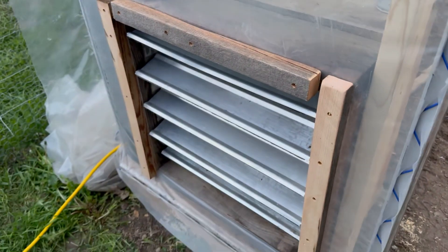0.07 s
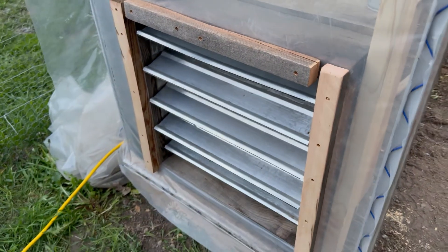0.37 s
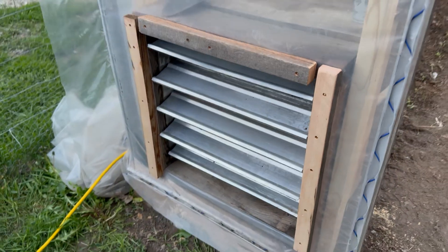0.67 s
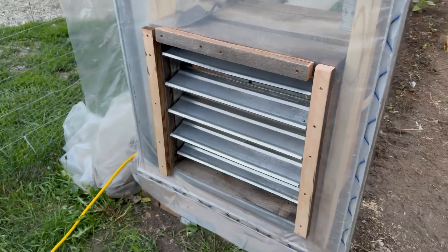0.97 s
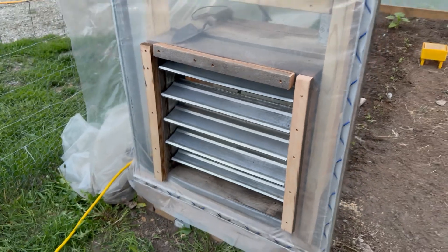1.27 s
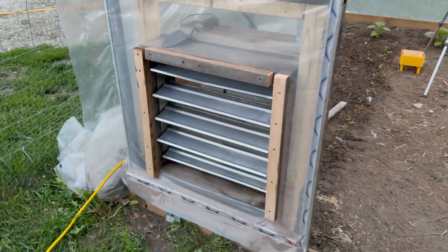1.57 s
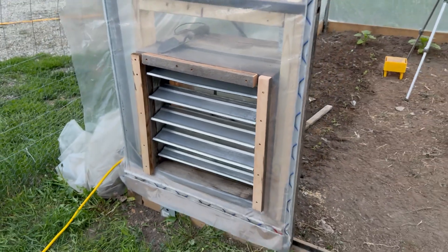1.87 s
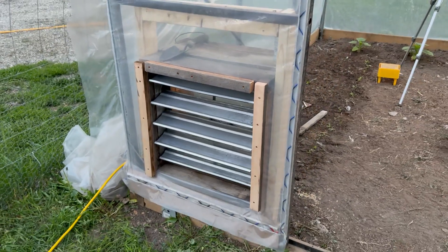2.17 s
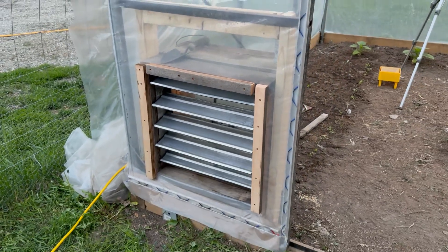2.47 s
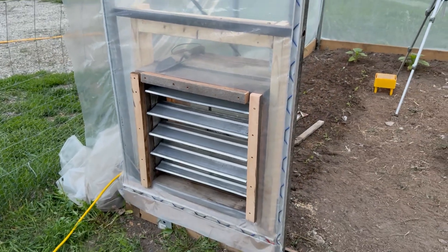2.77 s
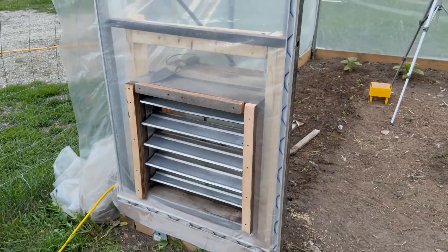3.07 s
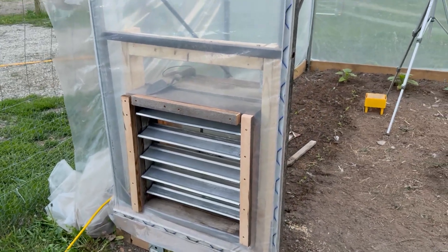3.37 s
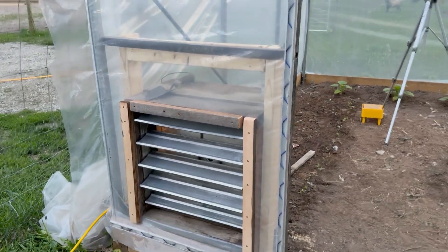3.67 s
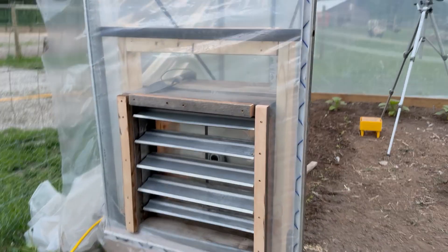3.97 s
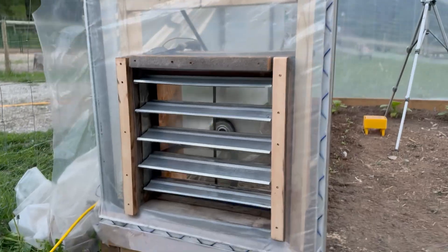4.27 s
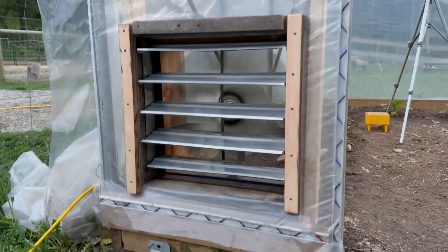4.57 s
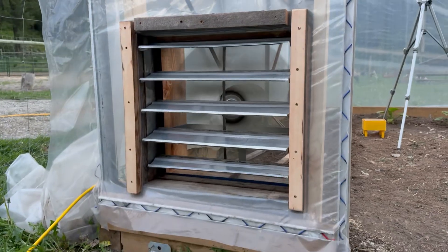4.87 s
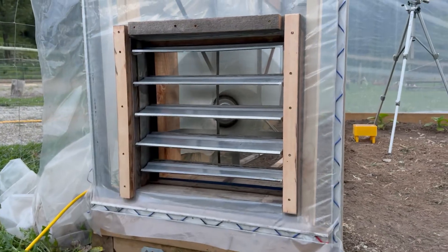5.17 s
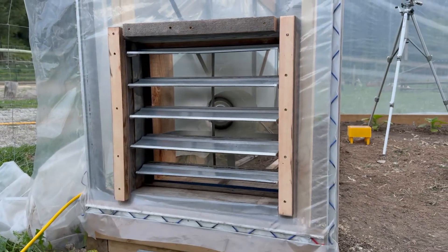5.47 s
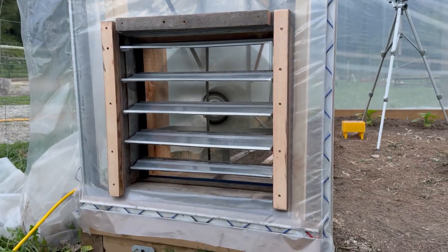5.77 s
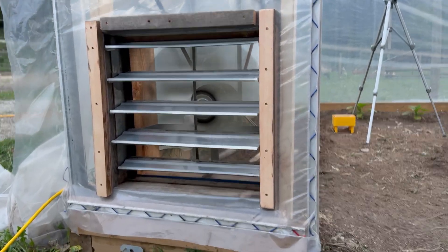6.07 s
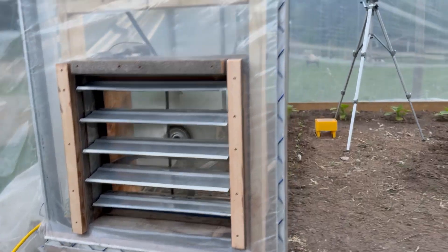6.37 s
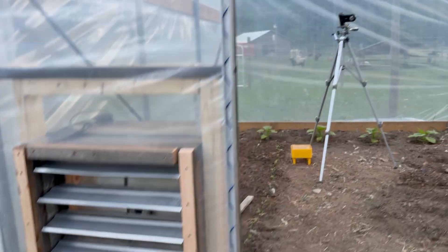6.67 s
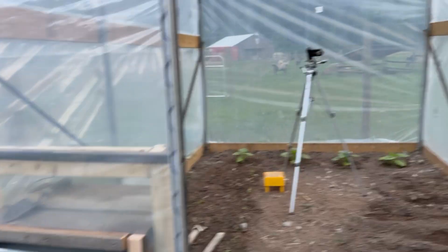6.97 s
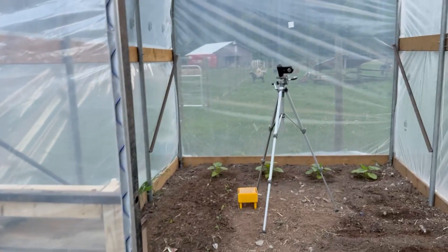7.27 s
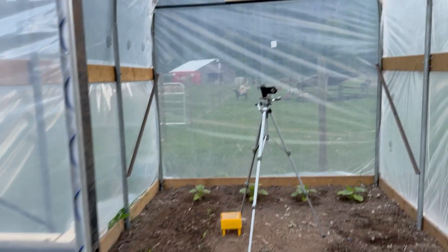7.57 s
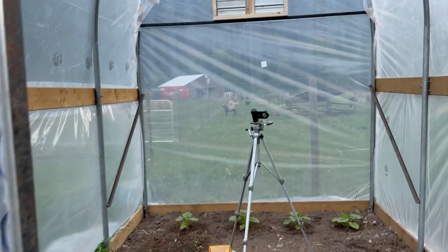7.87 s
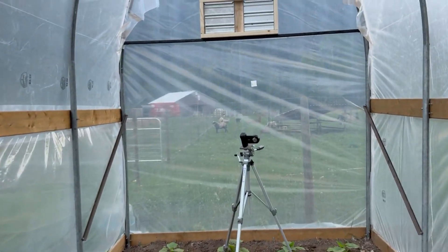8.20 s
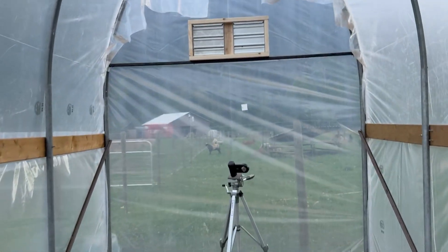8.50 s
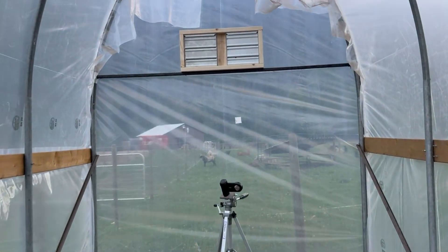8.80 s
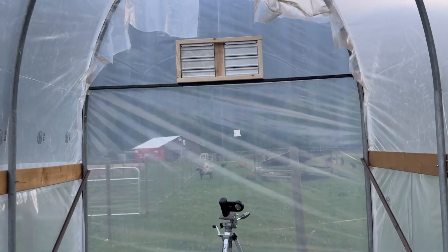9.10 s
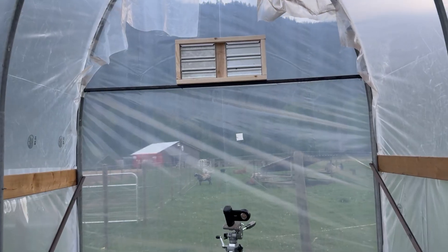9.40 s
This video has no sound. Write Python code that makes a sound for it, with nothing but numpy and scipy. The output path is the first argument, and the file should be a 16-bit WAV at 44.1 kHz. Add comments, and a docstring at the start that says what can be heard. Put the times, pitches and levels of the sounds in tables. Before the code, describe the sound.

An exhaust fan whirs behind metal louvres in the end wall of a plastic-covered greenhouse, with a low hum, rumbling air and a soft hiss. The microphone moves in front of the slats, past faint squeaky scrapes and soft swishes, and the hum swells. It then passes through the door, where the fan drops back, leaving a thinner rush along the plastic, a light rattle and one dry click.

```python
"""At the end wall of a plastic-covered greenhouse, an exhaust fan whirs behind metal louvres.
Its blades hum and chop the air stream, which rumbles, roars through the slats and hisses at their edges.
The microphone moves in front of the louvres, past faint scrapes and swishes, then through the door.
Inside, the wall shields the fan; a thinner rush along the film, a light rattle and one click remain."""
import sys
import numpy as np
from scipy import signal
from scipy.fft import rfft, irfft, next_fast_len
from scipy.io import wavfile
from scipy.ndimage import uniform_filter1d, map_coordinates

SR = 44100
rng = np.random.default_rng(int(sys.argv[2]) if len(sys.argv) > 2 else 0)


def put_to_file(sound):
    """Save the sound as 16-bit audio at rate SR, in the file named by the first command-line argument."""
    columns = np.atleast_2d(sound).T  # one column per channel
    safe = np.clip(columns, -1, 1)
    whole_steps = np.round(safe * 32767)
    wavfile.write(sys.argv[1], SR, whole_steps.astype(np.int16))


N = 420713
TIME_S = np.arange(N) / SR


def amp(db):
    """Decibels to gain."""
    return 10 ** (np.asarray(db) / 20)


def unit(x):
    """x at rms 1."""
    return x / np.sqrt(np.mean(x ** 2) + 1e-20)


def along(points, hz):
    """Interpolate (freq_hz, value) points on a log axis."""
    freqs, values = np.transpose(points)
    return np.interp(np.log(hz + 1), np.log(freqs + 1), values)


def curves(rows):
    """One value per sample for each column after the time."""
    times, *columns = np.transpose(rows)
    return [np.interp(TIME_S, times, column) for column in columns]


def bump(centre_s, sigma_s):
    """Gaussian envelope, peak 1."""
    return np.exp(-.5 * ((TIME_S - centre_s) / sigma_s) ** 2)


def wobble(rate_hz):
    """Smooth random curve, rate_hz knots a second."""
    return map_coordinates(rng.standard_normal(N // 40), [np.arange(N) * rate_hz / SR], mode="wrap")


def filtered(x, response):
    """Apply a complex frequency response."""
    size = next_fast_len(N + SR // 4, real=True)
    return irfft(rfft(x, size) * response(np.fft.rfftfreq(size, 1 / SR)), size)[..., :N]


def narrow(hz, width_hz):
    """Narrow-band noise of rms 1 around a moving pitch."""
    phase = 2 * np.pi * np.cumsum(hz) / SR
    return unit(wobble(width_hz) * np.cos(phase) + wobble(width_hz) * np.sin(phase))


def patchy(x, depth_db, bins=5, frames=16):
    """Eddies come and go: each narrow band swells and sinks on its own."""
    spectra = signal.stft(x, nperseg=1024)[2]
    eddies = uniform_filter1d(rng.standard_normal(spectra.shape[1:]), bins, axis=0)
    eddies = uniform_filter1d(eddies, frames, axis=1)
    return unit(signal.istft(spectra * amp(depth_db * unit(eddies)), nperseg=1024)[1][:, :N])


# Phase between the microphone ports: freq_hz, left_lead_rad
PORT_PHASE = [(130, 0), (400, -.2), (950, -.65), (1500, -.6), (2100, .3), (2900, -1), (4050, -.2),
              (5300, -.8), (6500, -.5), (7600, .9), (8750, 3.14), (11100, 6.28), (13350, 9.42),
              (15600, 12.57)]
# Port balance: freq_hz, left_minus_right_db
PORT_BALANCE = [(900, 0), (1450, -3), (2200, -.5), (3200, -2.2), (4500, -1.5), (6200, 1), (8200, 0)]
# Left-right diffuseness of the noise, almost none in the top treble: freq_hz, diffuse_re_common_db
STEREO_SPREAD = [(25, -16), (50, -27), (88, -35), (130, -21), (290, -15.5), (640, -11), (1000, -5.5),
                 (1450, -2.5), (2150, -6.5), (3000, -1), (4200, -4.5), (5300, -6), (7000, -2.5),
                 (7800, -1.5), (8500, -54), (15000, -40)]

def air(colour):
    """Turbulent stereo noise of rms 1, shaped by colour(hz)."""
    size = next_fast_len(N, real=True)
    hz = np.fft.rfftfreq(size, 1 / SR)
    common, apart = rfft(rng.standard_normal((2, size))) * colour(hz)
    spread = np.arctan(amp(along(STEREO_SPREAD, hz)))
    tilt = amp(along(PORT_BALANCE, hz) / 2) * np.exp(.5j * along(PORT_PHASE, hz))
    common, apart = common * np.cos(spread), apart * np.sin(spread)
    return unit(irfft([(common + apart) * tilt, (common - apart) / tilt], size)[:, :N])


def broad(spectrum):
    """Broadband air noise."""
    return air(lambda hz: amp(along(spectrum, hz)))


def resonant(modes):
    """Air noise in steep-sided resonances."""
    return air(lambda hz: sum(amp(db) / (1 + ((hz - centre) / width) ** 2) ** 2
                              for centre, width, db in modes))


def swelling_bands(rows):
    """Bands of air noise, each swelling and fading once."""
    return sum(amp(db) * bump(centre_s, sigma_s) * resonant([(hz, width_hz, 0)])
               for centre_s, sigma_s, hz, width_hz, db in rows)


# Greenhouse resonances: freq_hz, width_hz, level_db
TUNNEL_MODES = [(420, 50, 5), (1030, 150, 4), (1560, 150, 2), (1780, 80, 0), (1930, 90, 1.5),
                (2400, 300, -1.5)]
# Air along the film: freq_hz, density_db
FILM_SPECTRUM = [(150, -25), (260, -1), (430, 1), (1000, -4), (1400, 3), (2500, -9), (3500, -13),
                 (5000, -8), (6300, -8.5), (8000, -17), (10000, -26), (15000, -45)]

def tunnel_rush(level_db=-40.5, modes_db=-6, start_s=5.35, rise_s=4):
    """Air washes along the plastic film and rushes in hollow bands, growing on the way in."""
    inside = np.clip((TIME_S - start_s) / rise_s, 0, 1)
    return amp(level_db) * inside * (amp(modes_db) * resonant(TUNNEL_MODES) + broad(FILM_SPECTRUM))


# Bright brushes: centre_s, sigma_s, freq_hz, width_hz, level_db
SWISHES = [(2.742, .014, 11000, 3500, -51), (4.29, .04, 4350, 650, -48), (4.28, .03, 7000, 1000, -49)]

def swishes():
    """Short, soft brushes of noise, perhaps shoes in the grass."""
    return swelling_bands(SWISHES)


# Rough squeaks: start_s, length_s, pitch_hz, glide_hz_per_s, width_hz, level_db
SCRAPES = [(1.82, .26, 1850, 60, 150, -46), (1.85, 1, 1990, 0, 70, -47.5), (1.6, 1.5, 1550, 0, 140, -43),
           (2.76, .35, 2120, -60, 300, -39.5)]

def scrapes(waver=0.015, grit_db=2.0, release_s=0.035):
    """Something rubs: fuzzy, stuttering squeaks swell, overlap and break off."""
    out = np.zeros(N)
    for start_s, length_s, pitch_hz, glide_hz_per_s, width_hz, db in SCRAPES:
        age_s = np.clip(TIME_S - start_s, 0, length_s)
        hz = (pitch_hz + glide_hz_per_s * age_s) * (1 + waver * wobble(45))
        swell = np.sqrt(age_s / length_s) * np.minimum(1, (length_s - age_s) / release_s)
        grit = unit(amp(grit_db * wobble(70)))
        out += amp(db) * swell * grit * narrow(hz, width_hz)
    return out


# Ring of the click: freq_hz, level_db, t60_s
CLICK_MODES = [(2380, -3, .018), (2680, 0, .022), (3300, -13, .025), (4800, -13, .015)]

def click(start_s=9.4755, level_db=-29, crack_db=-5, crack_t60_s=.012):
    """One dry, close click: a short crack and a ring that dies at once."""
    age_s = np.maximum(0, TIME_S - start_s)
    ring = sum(amp(db - 60 * age_s / t60_s) * np.sin(2 * np.pi * hz * age_s)
               for hz, db, t60_s in CLICK_MODES)
    crack = (age_s > 0) * amp(crack_db - 60 * age_s / crack_t60_s) * resonant([(2800, 2500, 0)])
    return amp(level_db) * (ring + crack)


# Clear ticks of the loose part: start_s, level_db
TICKS = [(8.55, -34), (8.5944, -33), (8.6147, -38), (8.7282, -35), (8.7501, -33), (8.87, -34),
         (9.1238, -33), (9.1507, -33), (9.258, -35), (9.367, -34), (9.422, -35), (9.525, -33)]
# Its ring: freq_hz, level_db, t60_s
LOOSE_MODES = [(1600, -3, .025), (1920, -3, .045), (2230, -4, .022), (2580, -4, .025), (3300, -12, .015)]

def rattle(start_s=8.5, contacts=260, rate_hz=220, faint_db=-41, fade_db_per_s=5, trim_db=-0.5):
    """A loose part chatters in the draught: a few clear ticks among many faint ones, each ringing anew."""
    age_s = np.arange(SR // 20) / SR
    out = np.zeros((2, N + SR))
    gap_draw, level_draw = rng.random((contacts, 2)).T
    times_s = start_s + np.cumsum(-np.log(gap_draw)) / rate_hz
    levels_db = faint_db - fade_db_per_s * (times_s - start_s) + 5 * (2 * level_draw - 1)
    for hit_s, hit_db in [*TICKS, *zip(times_s, levels_db)]:
        onset = min(N, round(hit_s * SR))
        for hz, mode_db, t60_s in LOOSE_MODES:
            decay = amp(hit_db + trim_db + mode_db + rng.normal(0, 2.5) - 60 * age_s / t60_s)
            detuned_hz = hz * (1 + 0.017 * rng.normal())
            phase = 2 * np.pi * detuned_hz * age_s + rng.normal(size=(2, 1))
            out[:, onset:onset + len(age_s)] += decay * np.sin(phase)
    return out[:, :N]


# Air bands along the walk: centre_s, sigma_s, freq_hz, width_hz, level_db
PASSING_BANDS = [(3.6, 0.57, 520, 110, -31), (5.1, 0.97, 4500, 800, -50), (5.25, 0.38, 1760, 150, -43),
                 (.6, .5, 2520, 700, -45), (6.95, 0.3, 1640, 450, -41.5), (7.402, 0.43, 592.5, 171, -30),
                 (8.2, 0.095, 1110, 330, -36)]

def passing_bands():
    """Soft bands of air noise, hollow or hissy, swell and fade along the walk."""
    return swelling_bands(PASSING_BANDS)


# How squarely the microphone faces the outlet: time_s, gain_db
FACING = [(0, 2), (.6, 2.1), (1.4, 0.2), (2.3, -1.6), (3.8, -1), (4.3, 1.2), (5, 2), (6.5, 1.5),
          (7.3, -1.3), (8.2, -0.5), (9.54, -1)]
# Fan hidden by the end wall: time_s, hidden_fraction
SHIELDING = [(7.4, 0.02), (7.74, .02), (7.83, 0.24), (7.95, .12), (8.05, 0.2), (8.27, 0.24), (8.33, 0.55),
             (8.45, .43), (8.62, 0.73), (9.05, 0.93), (9.54, 0.68)]

def carried(level_db, per_facing, close_db, wall_loss_db, back_away_s=1.62):
    """Gain of a layer as the microphone leaves the frame, faces the outlet and passes the door."""
    close = np.maximum(0, 1 - TIME_S / back_away_s)
    facing_db, hidden = curves(FACING)[0], curves(SHIELDING)[0]
    return amp(level_db + per_facing * facing_db + close_db * close - wall_loss_db * hidden)


# Side of the fan: time_s, left_minus_right_db
FAN_SIDE = [(0, -4), (4.8, -3), (7.3, -1.5), (8.5, 6.5)]

def fan_pan():
    """Stereo gains: fan on the right, then on the left past the door."""
    return amp(np.outer([.5, -.5], curves(FAN_SIDE)[0]))


# Sliding air band: time_s, pitch_hz, level_db
HOLLOW_PATH = [(0, 1081, -38), (.4, 1070, -41), (.7, 719, -31), (1.3, 693, -34.5), (2, 842, -39),
               (3.4, 871.5, -39), (4.25, 959, -36.5), (4.6, 884.5, -36), (5.75, 842.5, -31.5),
               (6.4, 907, -37), (7.4, 960, -40), (8.3, 962, -48)]

def hollow_band(width_hz=130):
    """A hollow band of air noise slides as the angle to the slats changes."""
    pitch_hz, level_db = curves(HOLLOW_PATH)
    band = fan_pan() * amp(level_db) * narrow(pitch_hz, width_hz)
    return filtered(band, lambda hz: np.exp(1j * np.outer([.5, -.5], along(PORT_PHASE, hz))))


# Duct resonance: freq_hz, width_hz, level_db
DUCT_MODES = [(413, 120, 0)]
# Duct carry, best at a slant to the slats: level_db, per_facing, close_db, wall_loss_db
DUCT_CARRY = (-35, -1.5, 11, 31)
# Throaty puffs: centre_s, sigma_s, pitch_hz, level_db
PUFFS = [(0.206, 0.027, 355, -27), (2, .02, 450, -25.5), (2.08, 0.016, 480, -27), (2.44, .016, 619.6, -27),
         (2.578, 0.018, 476, -24.5), (3.08, 0.023, 590, -29), (4.244, 0.024, 424, -23.5),
         (6.744, 0.034, 417, -24.5), (7.92, 0.016, 617, -27), (8.207, 0.026, 570, -31),
         (8.426, .02, 501, -34)]

def duct(wander_rad=0.92, throb_db=3.0):
    """The short duct throbs with the eddies; large ones make it boom briefly at an unsteady pitch."""
    throb = carried(*DUCT_CARRY) * amp(throb_db * wobble(11)) * resonant(DUCT_MODES)
    drift = wander_rad * wobble(70)
    puffs = sum(amp(db) * bump(centre_s, sigma_s) * unit(np.cos(2 * np.pi * hz * TIME_S + drift))
                for centre_s, sigma_s, hz, db in PUFFS)
    return throb + puffs


# Ground reflection as the microphone rises and sinks: time_s, lag_ms, gain
GROUND_ECHO = [(0, 2, 0.14), (2.5, 2.15, 0.05), (3.9, 2.1, 0), (4.3, 2.35, 0.26), (5, 2.37, 0.3),
               (5.9, 2.42, 0.23), (6.5, 2.3, 0), (7.1, 2.6, 0.1), (7.9, 2.45, 0.2)]

def ground_bounce(x, cutoff_hz=2200):
    """A late copy off the ground makes a moving comb; grass swallows its treble."""
    lag_ms, gain = curves(GROUND_ECHO)
    dull = filtered(x, lambda hz: 1 / (1 + (hz / cutoff_hz) ** 4))
    late = np.array([np.interp(TIME_S - lag_ms / 1000, TIME_S, side) for side in dull])
    return (x + gain * late) / np.sqrt(1 + gain ** 2)


# Low turbulence: freq_hz, density_db
RUMBLE_SPECTRUM = [(20, -24), (32, -23), (45, -13), (60, -1.5), (78, 0), (105, -0.5), (150, 1.5),
                   (210, -1.5), (290, -10), (420, -31), (900, -73)]
# Housing resonances: freq_hz, width_hz, level_db
HOUSING_MODES = [(261, 23, 0), (337, 102, -2)]
# Carry of each: level_db, per_facing, close_db, wall_loss_db
RUMBLE_CARRY = (-31.5, 1.65, -1, 8)
HOUSING_CARRY = (-35.5, 1, 5, 6)

def rumble():
    """The air stream rumbles and the housing booms."""
    turbulence = carried(*RUMBLE_CARRY) * broad(RUMBLE_SPECTRUM)
    return turbulence + carried(*HOUSING_CARRY) * resonant(HOUSING_MODES)


# Air through the slats, low to high: freq_hz, density_db
ROAR_SPECTRUM = [(170, -53), (250, -15.5), (320, -6.5), (420, -1), (560, 2), (700, 0), (820, -6.5),
                 (1000, -20.5), (1500, -26), (4000, -81)]
WHIRR_SPECTRUM = [(450, -50), (680, -4), (800, 1), (900, 0.5), (1020, -0.5), (1220, -2), (1450, -14),
                  (2200, -29.5), (5000, -79)]
RUSH_SPECTRUM = [(600, -35), (1150, -1.5), (1550, 1.5), (2000, -2), (2700, -4.5), (3300, -8.5),
                 (4200, -18.5), (8000, -53)]
HISS_SPECTRUM = [(1800, -8.5), (2700, -2), (3200, -.5), (4000, -0.5), (5000, 2.2), (6200, -.3),
                 (7500, -4.2), (8700, -3.8), (10000, -3.6), (13000, -8.6), (15700, -10)]
# Carry of roar and whirr: level_db, per_facing, close_db, wall_loss_db
ROAR_CARRY = (-25.5, 0.74, -1, 15.5)
WHIRR_CARRY = (-32.5, 1.87, -3, 8)
# Treble along the walk: time_s, rush_db, hiss_db
TREBLE_LEVELS = [(0, -37, -41), (.7, -37, -41), (1.5, -37.5, -43), (2.4, -37.5, -44), (3.8, -36.5, -43),
                 (4.25, -34.5, -41), (5.3, -34, -41), (6.5, -34, -41.5), (7.05, -35.5, -44),
                 (7.5, -37.5, -44.5), (8.2, -41, -47.5), (8.7, -40.5, -47.5), (9.54, -41, -46.5)]

def air_stream(angle, roar_chop=0.13, whirr_chop=0.07, rush_chop=0.05):
    """Turbulence through the slats pulses once per blade, with rumble below and edge hiss above."""
    surge = wobble(14)
    pulse = np.cos(angle) + .6 * np.cos(2 * angle)
    rush_db, hiss_db = curves(TREBLE_LEVELS)
    low = rumble()
    roar = carried(*ROAR_CARRY) * amp(0.089 * surge) * broad(ROAR_SPECTRUM)
    roar *= 1 + roar_chop * pulse
    whirr = carried(*WHIRR_CARRY) * amp(0.45 * surge) * patchy(broad(WHIRR_SPECTRUM), depth_db=1.0)
    whirr *= 1 + whirr_chop * pulse
    rush = amp(rush_db + 0.24 * surge) * patchy(broad(RUSH_SPECTRUM), depth_db=0.5)
    rush *= 1 + rush_chop * pulse
    hiss = amp(hiss_db + 0.32 * wobble(15)) * patchy(broad(HISS_SPECTRUM), depth_db=1.75)
    pan = fan_pan()
    return low + pan * roar + ground_bounce(pan * whirr + rush) + hiss


def blade_angle(blade_hz=87.72, drift_rad=0.03):
    """Blade-pass phase: steady motor speed with a slight drift."""
    return 2 * np.pi * blade_hz * TIME_S + drift_rad * wobble(0.83)


def blade_tone(angle, harmonic, shake):
    """One blade harmonic at rms 1; uneven inflow shakes the higher ones faster."""
    rate_hz = max(11, 5 * harmonic)
    eddies = wobble(rate_hz) + 1j * wobble(rate_hz)
    phase = harmonic * angle + rng.uniform(0, 2 * np.pi)
    return unit(np.real((1 + shake * eddies) * np.exp(1j * phase)))


# Dips in the hum: centre_s, harmonic, depth_db, sigma_s
HUM_DIPS = [(.14, 2, 14, .022), (.77, 2, 20, .029), (1.61, 1, 7, .029), (1.75, 2, 9, .029),
            (2.05, 2, 14, .029), (2.29, 2, 9, .029), (2.65, 2, 7, .05), (3.28, 2, 9, .029),
            (3.46, 2, 19, .029), (5.4, 2, 7, .03), (5.8, 1, 6, .025), (6.04, 1, 15, .016)]

def dips(harmonic):
    """Gain of one harmonic: its level dips briefly."""
    return amp(-sum(depth_db * bump(centre_s, sigma_s)
                    for centre_s, number, depth_db, sigma_s in HUM_DIPS if round(number) == harmonic))


# Blade tone and its octave along the walk: time_s, first_db, second_db
HUM_LEVELS = [(0.0, -28, -33), (1.15, -23.5, -29.5), (2.25, -26, -32), (2.9, -21.5, -29),
              (3.45, -25.5, -31.5), (4.6, -19, -24), (5.2, -18.5, -26.5), (5.75, -22, -27.0),
              (6.4, -19.5, -28), (6.95, -26.5, -37.5), (7.5, -25, -30.5), (8.6, -27.5, -47),
              (9.54, -38.5, -45.5)]
# Third harmonic, varying with position: time_s, level_db
THIRD_LEVELS = [(0, -36), (.5, -38.5), (.85, -47), (1.2, -29), (1.6, -39.5), (2.6, -54), (3, -39.5),
                (3.9, -43.5), (4.3, -26.5), (4.52, -39), (4.72, -29), (5.1, -36.5), (5.6, -32),
                (6.2, -30.5), (6.6, -38.5), (7.5, -40.5), (8.4, -53.5)]
# Higher blade harmonics: harmonic, level_db
OVERTONES = [(4, -12), (5, -9.5), (6, -9.5), (7, -12.5)]
# Their carry: level_db, per_facing, close_db, wall_loss_db
OVERTONE_CARRY = (-28, 0.5, 3, 16)

def fan_hum(angle, drone_hz=81.95, drone_db=-15.5, mains_hz=120, mains_db=-25):
    """Each passing blade pushes the air; a low drone beats with the tone and the motor adds mains hum."""
    first_gain, second_gain = amp(curves(HUM_LEVELS))
    flicker = amp(0.6 * wobble(5.4))
    second = second_gain * dips(2) * unit(flicker * blade_tone(angle, 2, shake=0.28))
    third = amp(curves(THIRD_LEVELS)[0]) * blade_tone(angle, 3, shake=0.39)
    upper = sum(amp(db) * blade_tone(angle, round(harmonic), shake=0.71) for harmonic, db in OVERTONES)
    exposed = 1 - curves(SHIELDING)[0]
    # drone_db and mains_db are relative to the blade tone
    drone = amp(drone_db) * exposed * narrow(np.full(N, drone_hz), width_hz=3.14)
    mains = amp(mains_db) * unit(np.sin(2 * np.pi * mains_hz * TIME_S))
    low = first_gain * dips(1) * (blade_tone(angle, 1, shake=0.14) + drone + mains)
    return low + second + third + carried(*OVERTONE_CARRY) * upper


def scene():
    """Hum and air stream share one rotor; small noises sound along the walk."""
    angle = blade_angle()
    fan = fan_hum(angle) + air_stream(angle) + duct() + hollow_band() + passing_bands()
    return fan + tunnel_rush() + scrapes() + swishes() + rattle() + click()


def record(dry, cutoff_hz=15750):
    """Brick-wall low-pass."""
    return filtered(dry, lambda hz: hz < cutoff_hz)


dry = scene()
out = record(dry)
put_to_file(out)
```